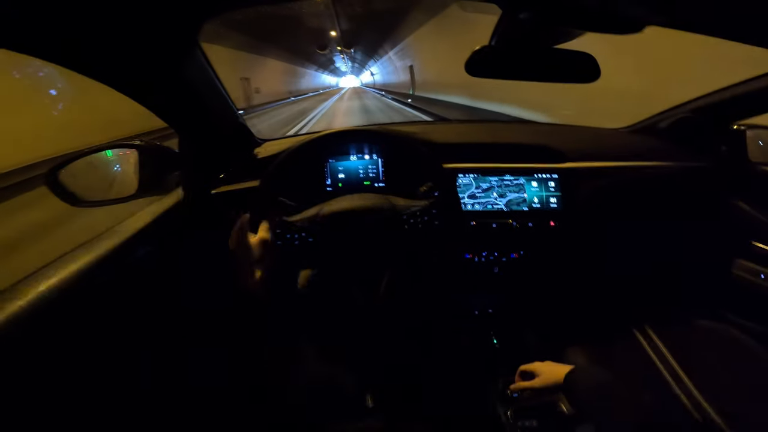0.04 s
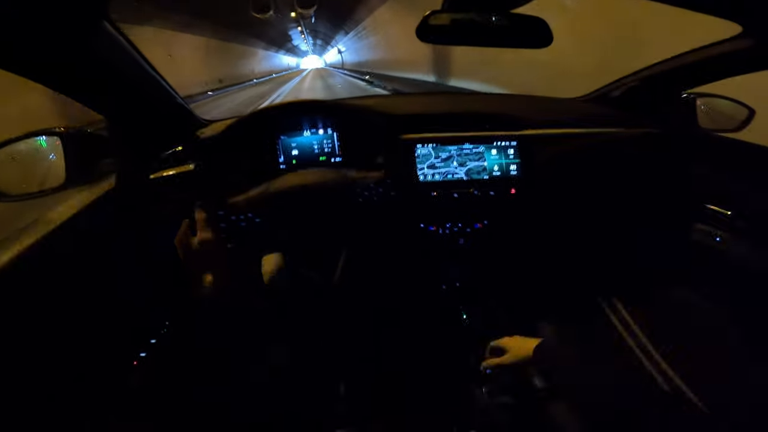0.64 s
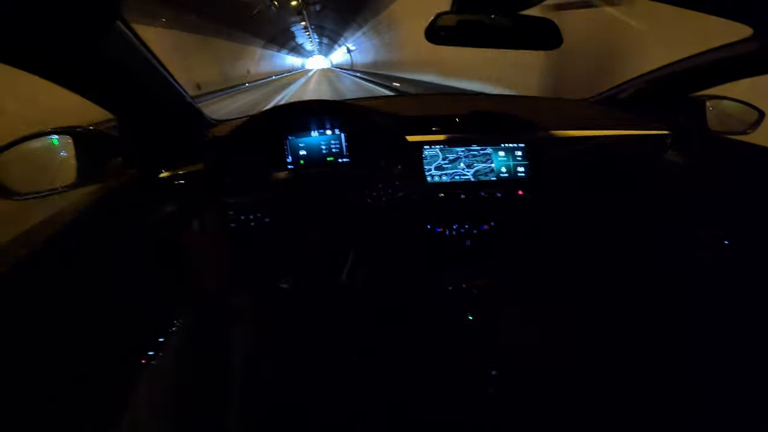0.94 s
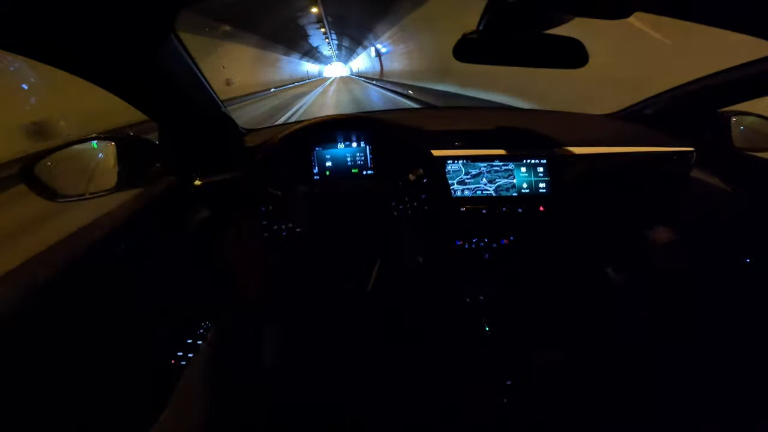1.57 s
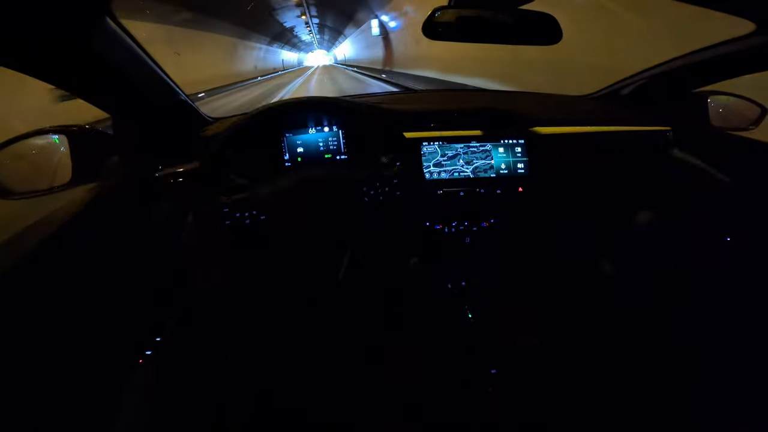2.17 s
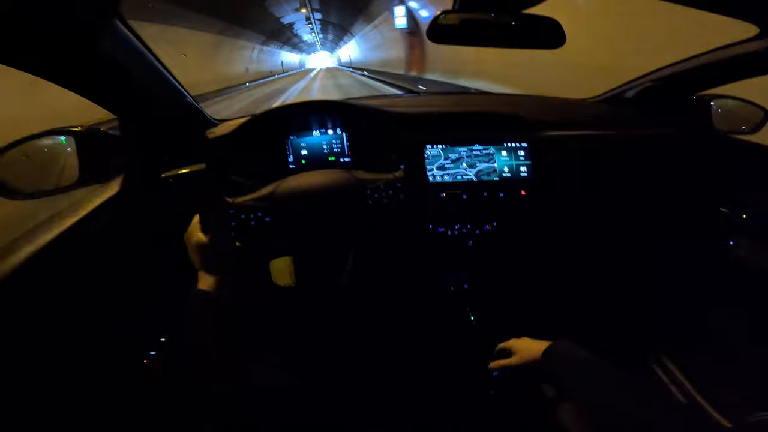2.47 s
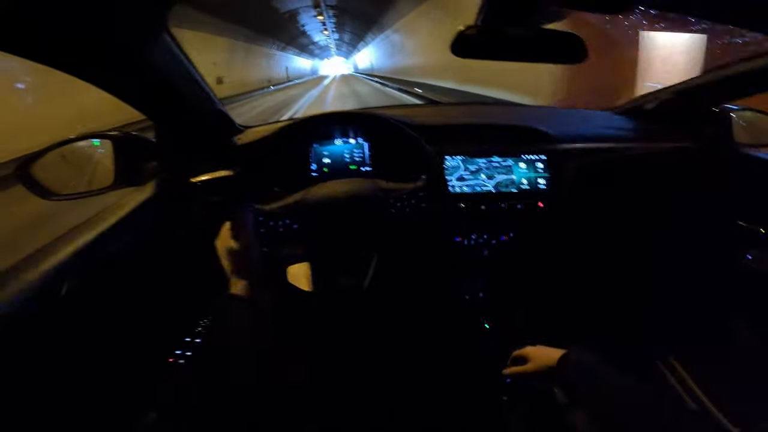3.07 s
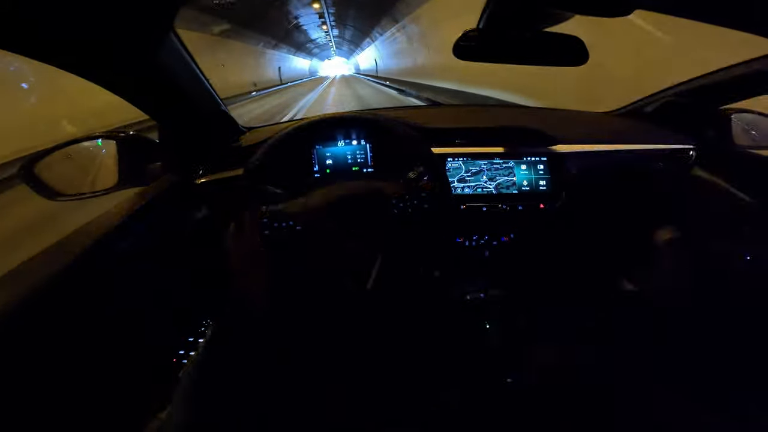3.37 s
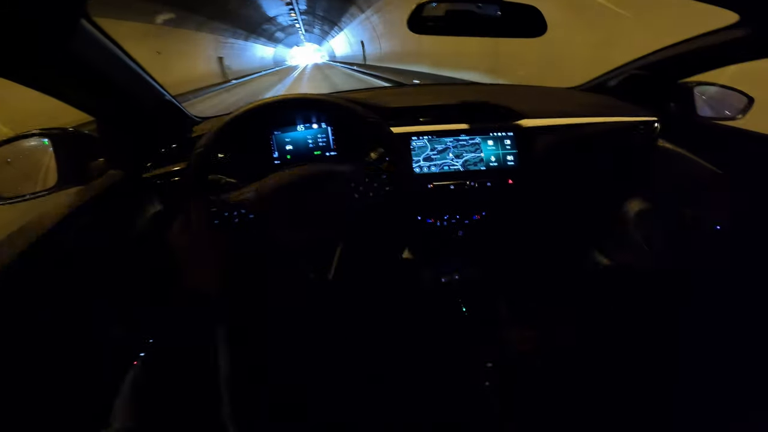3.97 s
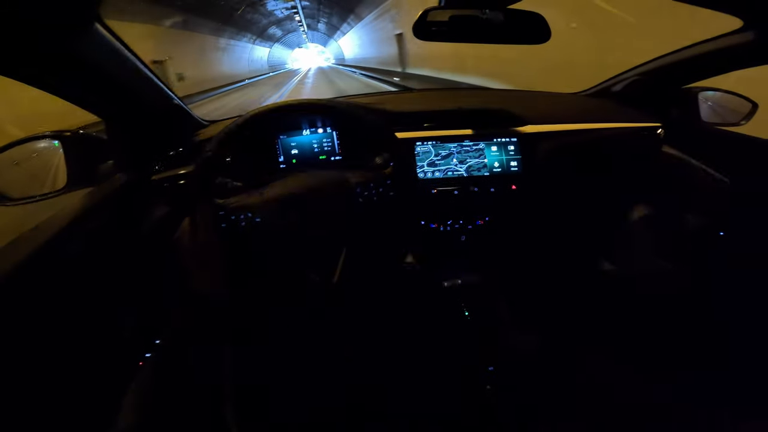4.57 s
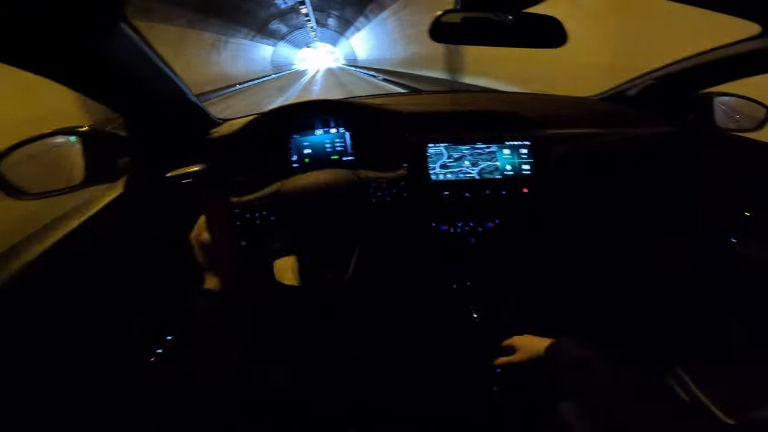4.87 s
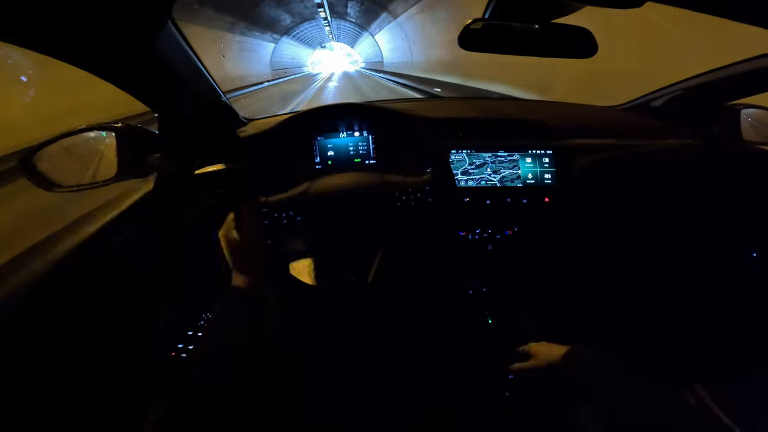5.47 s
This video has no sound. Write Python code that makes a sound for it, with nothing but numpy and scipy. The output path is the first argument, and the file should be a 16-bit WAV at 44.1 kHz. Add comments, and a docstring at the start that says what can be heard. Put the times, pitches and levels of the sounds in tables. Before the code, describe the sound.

A car cruises through a road tunnel, heard from between the front seats for about five and a half seconds. A deep, muffled boom and suspension rumble dominate from start to finish. The boom swells irregularly over uneven asphalt, most noticeably around 0.5 to 0.8 seconds, 1.5 seconds and 4.5 seconds. The cabin hums, and a low engine note holds steady underneath without revving. The tyres add a low drone, a softer broad roar and a faint, fuzzy mid-pitched whine, which lifts slightly near 2.3, 2.9 and 4.4 seconds and eases after 5 seconds. A very thin hiss from the damp road comes through the closed windows all the way through. At about 0.1 to 0.4 seconds, one faint, brighter, grainy swish rises and falls, with two tiny ticks as it swells. The speed and overall loudness stay about the same.

```python
"""Low boom and rumble inside a car cruising through a road tunnel.
Uneven asphalt rocks the body and shakes the suspension; cabin air hums, the tyres ring and drone.
Tread blocks slap the road: a broad roar and a fuzzy whine near 1 kHz, over a low engine hum.
Thin hiss from the damp road comes through the glass, with one brief brighter swish near the start."""
import sys
import numpy as np
from scipy import signal
from scipy.fft import rfft, irfft
from scipy.io import wavfile
from scipy.ndimage import uniform_filter1d

SR = 44100
rng = np.random.default_rng(int(sys.argv[2]) if len(sys.argv) > 2 else 0)


def pcm_store(signal):
    """Save signal as 16-bit PCM."""
    levels = np.round(np.clip(np.atleast_2d(signal), -1, 1) * 32767)
    wavfile.write(sys.argv[1], SR, levels.astype(np.int16).T)


N = 247842
TIME_S = np.arange(N) / SR
FREQ_HZ = np.fft.rfftfreq(N, 1 / SR)

# body boom: f/Hz, relative density/dB
BOOM_SPECTRUM = [(3, -26), (6.5, -6), (12, -14), (24, -8), (31, 2.5), (39, 0), (47, -9), (56, -10),
                 (66, -18), (85, -32)]
# road dips and humps that heave the body: centre t/s, length/s, boom lift/dB
ROAD_HUMPS = [(0.083, 0.15, 6), (0.2, 0.11, 5.5), (.535, 0.19, 7), (0.723, 0.33, 8.5), (1.03, 0.091, 2),
              (1.19, 0.11, 4.5), (1.348, .1, 2.5), (1.476, 0.17, 8), (1.622, .13, 8), (1.85, 0.22, 2),
              (2.58, 0.16, 5.5), (2.76, 0.13, 4), (3.023, 0.12, 4.5), (3.252, .2, 2), (3.412, .1, 5),
              (3.758, 0.22, 6), (3.962, 0.25, 4), (4.12, 0.16, 6), (4.313, 0.17, 4.5), (4.53, 0.11, 7.5),
              (4.88, 0.15, 6), (5.172, 0.33, 5.5)]
# suspension rumble: f/Hz, relative density/dB
RUMBLE_SPECTRUM = [(58, -19), (74, -11.5), (88, -3.5), (106, -2), (118, .5), (128, 2.7), (140, -.5),
                   (152, -7), (182, -11), (215, -22)]
# suspension shaking: t/s, level/dB
RUMBLE_ENVELOPE = [(0.0, -33.5), (0.3, -34), (0.48, -30.5), (0.7, -34.5), (0.9, -32.5), (1.2, -33.5),
                   (1.52, -30), (1.66, -37), (2.08, -33), (2.27, -36), (2.45, -34), (2.93, -32),
                   (3.3, -34.5), (3.75, -32.5), (4.1, -33.5), (4.4, -33), (4.78, -30.5), (4.92, -35.5),
                   (5.02, -33), (5.25, -32), (5.6, -33.5)]
# cabin and panel resonances: f/Hz, width/Hz, lift/dB
CABIN_MODES = [(84.9, 11, 3.5), (254.4, 5.9, 2.5), (366, 21, 3), (389.3, 39, 2.5)]
# cabin air resonance: f/Hz, relative density/dB
HUM_SPECTRUM = [(136, -12), (148, -1.5), (164, 0), (172, -3.5), (184, -12)]
# cabin air hum: t/s, level/dB
HUM_ENVELOPE = [(0, -40), (.28, -37.5), (.55, -44), (1.05, -38), (1.8, -40.5), (2.6, -38.5), (3.0, -39),
                (3.12, -36.5), (3.65, -38), (3.86, -36.5), (4.07, -44), (4.22, -35), (4.39, -48.5),
                (4.57, -35), (4.84, -48), (5.03, -32.5), (5.6, -41)]

# tyre air resonance: f/Hz, relative density/dB
RING_SPECTRUM = [(204, -16), (212, -5), (217, 0), (222, -7), (229, -14), (236, -6), (243, -18)]
# tyre air ring: t/s, level/dB
RING_ENVELOPE = [(0, -46.5), (.33, -39), (.6, -45), (1, -50.5), (1.5, -44), (1.98, -49), (2.14, -41.5),
                 (2.4, -46), (2.95, -45.5), (3.13, -37.5), (3.35, -42.5), (3.48, -50.5), (3.72, -40),
                 (4.1, -50), (4.33, -41), (4.72, -45.5), (4.86, -41.5), (5.15, -47.5), (5.37, -41.5),
                 (5.6, -42.5)]
# tyre carcass drone: f/Hz, relative density/dB
DRONE_SPECTRUM = [(150, -16), (183, .5), (202, -.7), (225, -3.7), (250, -2.5), (310, -4.2), (350, -9.3),
                  (390, -9.3), (422, -17.8), (500, -23), (650, -35)]
# tyre carcass drone: t/s, level/dB
DRONE_ENVELOPE = [(0.0, -40), (0.4, -41.5), (0.9, -42.5), (1.3, -41.5), (1.56, -42.5), (1.73, -41),
                  (2.1, -41.5), (2.4, -40.5), (2.75, -42), (3.0, -39.8), (3.5, -42.5), (3.75, -41),
                  (4.1, -42.5), (4.3, -41), (4.6, -43), (4.95, -40.5), (5.3, -41.5), (5.6, -43)]
# tread roar: f/Hz, relative density/dB
ROAR_SPECTRUM = [(330, -11.5), (450, 2), (550, -1.5), (700, -2.5), (860, -2), (1000, -3), (1160, -2),
                 (1300, -9.5), (1600, -12), (2000, -17.5), (2600, -27.5)]
# resonances in the roar: f/Hz, width/Hz, lift/dB
ROAR_RESONANCES = [(1470, 41, 3.5), (1320, 50, 1.5)]
# road coarseness: t/s, roar lift/dB
COARSENESS = [(0.0, 2), (0.45, 0.5), (0.8, -0.36), (2.0, -.1), (2.7, 0.5), (3.4, -0.8), (3.75, 0.5),
              (4.15, -0.7), (5.6, -0.8)]
# spread of block strike rates: f/Hz, relative density/dB
WHINE_SPECTRUM = [(868, -12), (905, -1), (935, -2.5), (965, -2.5), (1018, -4), (1045, -13.5)]
# commonest strike rates: f/Hz, level re the spread/dB
WHINE_TONES = [(915, -8.3), (982, -8.8)]
# swells and dips of the whine: centre t/s, length/s, lift/dB
WHINE_SWELLS = [(.17, 0.12, 1), (0.68, .25, -2), (1.72, 0.3, -2), (2.323, 0.21, 2.5), (2.852, 0.18, 3.5),
                (4.225, .14, -3), (4.357, 0.1, 4), (5.07, 0.42, -3.5), (5.516, 0.33, -7.5)]

# engine orders: multiple of crank rate, level/dB
ENGINE_ORDERS = [(1, -46.5), (2, -46), (3, -43)]

# damp road hiss: f/Hz, relative density/dB
HISS_SPECTRUM = [(1900, -14), (2400, -4.3), (2800, -1.8), (3250, .9), (4100, -3), (4500, -6.3),
                 (4900, -8.5), (7100, -14), (8700, -26), (10500, -28), (11500, -39)]
# damp road hiss: t/s, body gain/dB, treble gain/dB
HISS_ENVELOPE = [(0.08, -67, -68.5), (0.5, -68.5, -69), (0.9, -70, -71), (1.47, -68.5, -70),
                 (1.75, -69.5, -71.5), (2.65, -69, -69), (3.35, -70, -68.9), (3.7, -69, -69),
                 (4.05, -70.5, -69), (4.45, -70, -69.5), (5.05, -71.5, -71), (5.4, -70.5, -69.5)]
# swish: f/Hz, relative density/dB
SWISH_SPECTRUM = [(1600, -14), (3000, -2), (5000, 0), (7500, -3), (9200, -9), (11500, -12), (14500, -25)]
# ticks as the swish swells: t/s, level/dB
TICKS = [(0.139, -71.5), (0.162, -66.5)]
# ticks: f/Hz, relative density/dB
TICK_SPECTRUM = [(3000, -3), (5000, 0), (7500, -1), (9200, -12), (11500, -17)]

# left-right likeness in the cabin: f/Hz, coherence/(0-1)
STEREO_COHERENCE = [(30, .9996), (60, .9993), (140, .9996), (190, .996), (270, .97), (580, .87), (1230, .8),
                    (2620, .52), (5570, .67), (11800, .66)]
# balance: f/Hz, left minus right/dB
STEREO_BALANCE = [(60, 0.0), (110, 0.0), (190, 0.0), (350, 0.5), (630, 2.0), (1130, 3.0), (2030, 2.5),
                  (3660, 3.0), (6580, 1.5), (11800, 2.0)]
# phase: f/Hz, left lead/rad
STEREO_LEAD = [(220, 0), (600, -.1), (2150, -.8), (3100, -.7), (4480, .1), (7580, .2), (8350, 0)]


def body_boom(level_db=-33):
    """Long waves in the road rock the body, which pumps the cabin air."""
    boom = cabin_noise(band_db(BOOM_SPECTRUM), hold_s=.055)
    return boom * gain(level_db + arches_db(ROAD_HUMPS) + .35 * drift(rate_hz=3.8))


def suspension_rumble():
    """Coarse asphalt shakes the suspension; cabin and panels resonate."""
    rumble = cabin_noise(band_db(RUMBLE_SPECTRUM) + resonances_db(CABIN_MODES), hold_s=.065)
    return rumble * gain(over_time(RUMBLE_ENVELOPE))


def cabin_hum():
    """Road shake drives a broad resonance of the cabin air."""
    return cabin_noise(band_db(HUM_SPECTRUM), hold_s=.13) * gain(over_time(HUM_ENVELOPE))


def tyre_ring():
    """The air inside the tyres rings in two close peaks."""
    return cabin_noise(band_db(RING_SPECTRUM), hold_s=.13) * gain(over_time(RING_ENVELOPE))


def tyre_drone():
    """The carcasses vibrate, heard through the cabin resonances."""
    drone = cabin_noise(band_db(DRONE_SPECTRUM) + resonances_db(CABIN_MODES), hold_s=.11)
    return drone * gain(over_time(DRONE_ENVELOPE))


def tread_roar(level_db=-50):
    """Tread blocks slap the road: a broad, fluttering roar that follows the coarseness."""
    flutter_db = .44 * drift(rate_hz=25)
    roar = cabin_noise(band_db(ROAR_SPECTRUM) + resonances_db(ROAR_RESONANCES), hold_s=.27)
    return roar * gain(level_db + over_time(COARSENESS) + flutter_db)


def tread_whine(level_db=-56):
    """Unequal block lengths smear the strike rate into a fuzzy note with two wavering tones inside."""
    whine = cabin_noise(band_db(WHINE_SPECTRUM), hold_s=.12)
    for tone_hz, tone_db in WHINE_TONES:
        cycles = np.cumsum(tone_hz * (1 + .009 * drift(rate_hz=7))) / SR
        amplitude = np.sqrt(2) * gain(tone_db + 2.2 * drift(rate_hz=5.9))
        whine += amplitude * np.sin(2 * np.pi * cycles)
    surface_db = .44 * over_time(COARSENESS)
    return whine * gain(level_db + surface_db + arches_db(WHINE_SWELLS))


def engine_hum(crank_hz=42.71):
    """Low crank orders under light, steady load; each wavers in strength."""
    turns = np.cumsum(crank_hz * (1 + .0089 * drift(rate_hz=2.9))) / SR
    hum = np.zeros(N)
    for order, level_db in ENGINE_ORDERS:
        amplitude = np.sqrt(2) * gain(level_db + 3.3 * drift(rate_hz=3.5))
        hum += amplitude * np.sin(2 * np.pi * (order * turns + rng.random()))
    return hum


def road_hiss(treble_hz=5200):
    """Fine spray and rushing air, dulled by the windows; the treble swells and eases separately."""
    flicker_db = .8 * drift(rate_hz=67)
    hiss = cabin_noise(band_db(HISS_SPECTRUM), hold_s=.22)
    treble = irfft(rfft(hiss) * np.clip(FREQ_HZ / treble_hz, 0, 1) ** 4, N)
    t_s, body_db, treble_db = np.transpose(HISS_ENVELOPE)
    body = (hiss - treble) * gain(np.interp(TIME_S, t_s, body_db))
    treble *= gain(np.interp(TIME_S, t_s, treble_db))
    return (body + treble) * gain(flicker_db)


def swish(peak_s=.238, peak_db=-67.1, rise_s=.135, fall_s=.11):
    """Bright, grainy hiss that swells and dies in one round arch."""
    since_peak_s = TIME_S - peak_s
    distance = since_peak_s / np.where(since_peak_s < 0, rise_s, fall_s)
    level_db = peak_db - 18 * np.minimum(distance ** 2, 10)
    grain_db = 1.2 * drift(rate_hz=260)
    return cabin_noise(band_db(SWISH_SPECTRUM), hold_s=.04) * gain(level_db + grain_db)


def swish_ticks(decay_s=.004):
    """Two small, duller ticks as the swish swells."""
    envelope = np.zeros(N)
    for start_s, level_db in TICKS:
        envelope += (TIME_S >= start_s) * gain(level_db) * np.exp(-abs(TIME_S - start_s) / decay_s)
    return cabin_noise(band_db(TICK_SPECTRUM), hold_s=.04) * envelope


def cabin_noise(shape_db, hold_s):
    """Shaped stereo noise; power of the channel mean held near 1 over spans of hold_s."""
    left, independent = rfft(rng.standard_normal((2, N)))
    coherence = np.clip(over_freq(STEREO_COHERENCE), 0, 1)
    right = coherence * left + np.sqrt(1 - coherence ** 2) * independent
    right *= np.exp(-1j * over_freq(STEREO_LEAD))
    tilt = gain(over_freq(STEREO_BALANCE) / 2)
    pair = irfft(np.array([left * tilt, right / tilt]) * gain(shape_db), N)
    power = pair.mean(0) ** 2
    for _ in range(2):
        power = uniform_filter1d(power, int(hold_s * SR), mode="wrap")
    return pair / np.sqrt(abs(power) + 1e-20)


def band_db(spectrum, skirt_db_per_octave=48):
    """Tabulated spectrum with steep skirts beyond its ends."""
    in_band_hz = np.clip(FREQ_HZ + .15, spectrum[0][0], spectrum[-1][0])
    octaves_out = abs(np.log2((FREQ_HZ + .076) / in_band_hz))  # offset keeps 0 Hz finite
    return over_freq(spectrum) - skirt_db_per_octave * octaves_out


def resonances_db(modes):
    """Spectral lift from a set of resonances."""
    return sum(db / (1 + (2 * (FREQ_HZ - hz) / width_hz) ** 2) for hz, width_hz, db in modes)


def arches_db(arches):
    """Sum of half-cosine swells and dips."""
    return sum(db * np.cos(np.pi * np.clip((TIME_S - centre_s) / length_s, -.5, .5))
               for centre_s, length_s, db in arches)


def drift(rate_hz):
    """Smooth random motion, zero mean, rms 1."""
    lowpass = np.exp(-(FREQ_HZ / rate_hz) ** 2) * (FREQ_HZ > 0)
    motion = irfft(rfft(rng.standard_normal(N)) * lowpass, N)
    return motion / np.sqrt(np.mean(motion ** 2) + 1e-20)


def over_freq(table):
    """Table value per bin, on a log-frequency axis."""
    f_hz, value = np.transpose(table)
    return np.interp(np.log(FREQ_HZ + 1), np.log(f_hz + 1), value)


def over_time(table):
    """Table value per sample."""
    return np.interp(TIME_S, *np.transpose(table))


def gain(db):
    """dB to amplitude."""
    return 10 ** (db / 20)


def scene():
    """All sources, heard from between the front seats."""
    cabin = body_boom() + suspension_rumble() + cabin_hum()
    tyres = tyre_ring() + tyre_drone() + tread_roar() + tread_whine()
    return cabin + tyres + engine_hum() + road_hiss() + swish() + swish_ticks()


def record(dry):
    """Short end fades, then a 15 kHz low-pass."""
    faded = dry * signal.windows.tukey(N, .002)
    taps = signal.firwin(255, 15000, window=("kaiser", 9), fs=SR)
    return signal.oaconvolve(faded, taps[None], "same", axes=1)


dry = scene()
out = record(dry)
pcm_store(out)
```